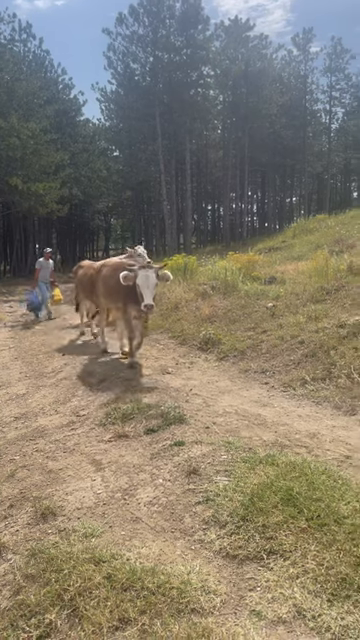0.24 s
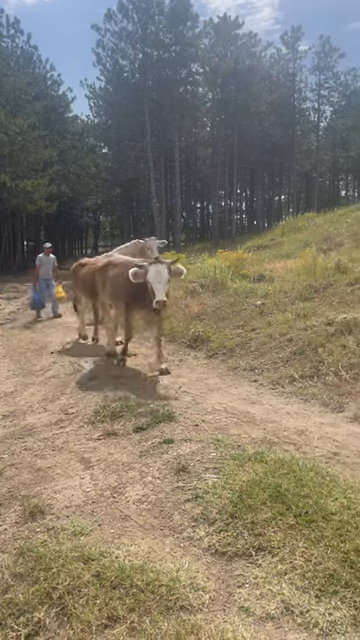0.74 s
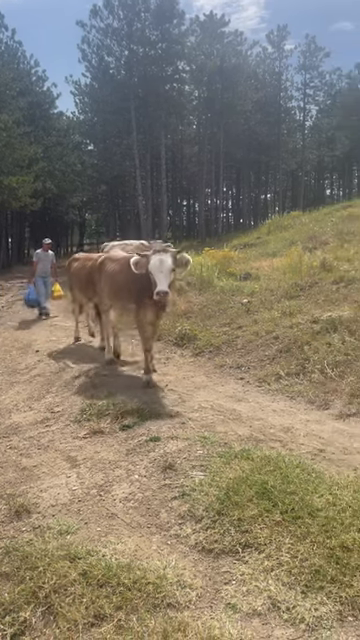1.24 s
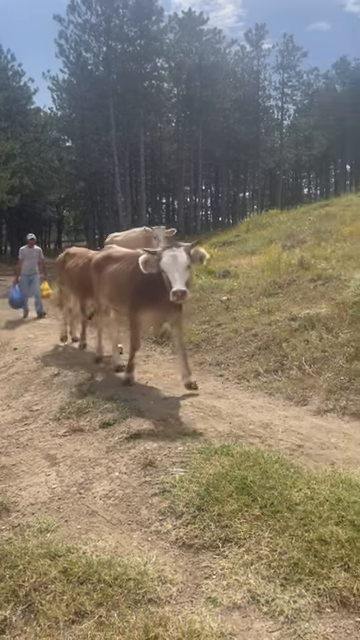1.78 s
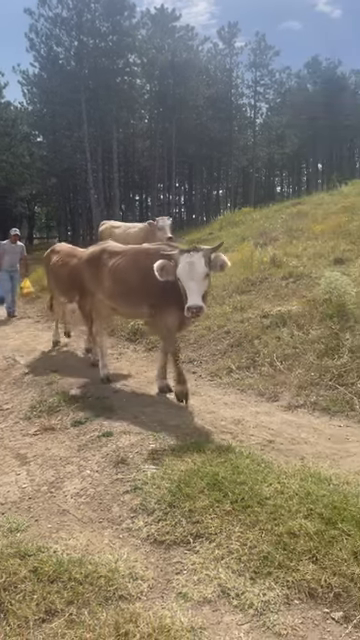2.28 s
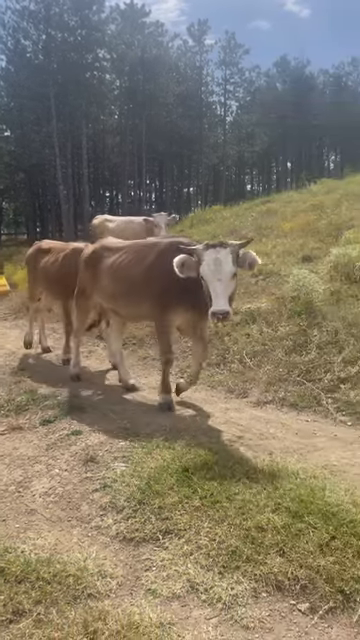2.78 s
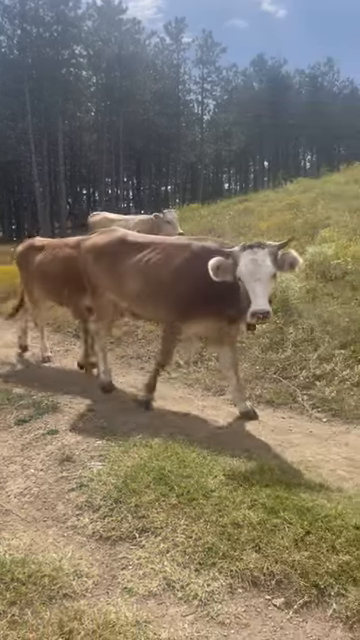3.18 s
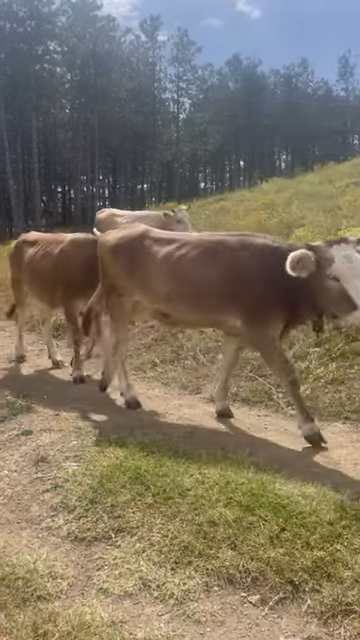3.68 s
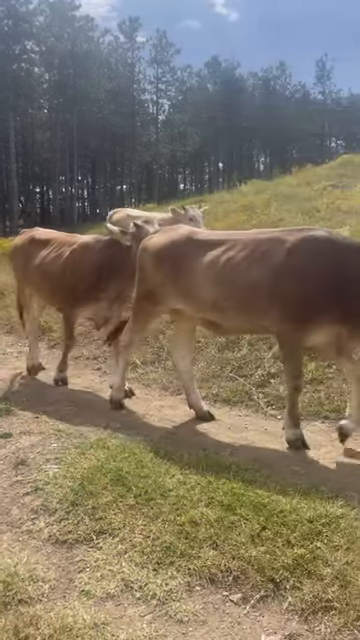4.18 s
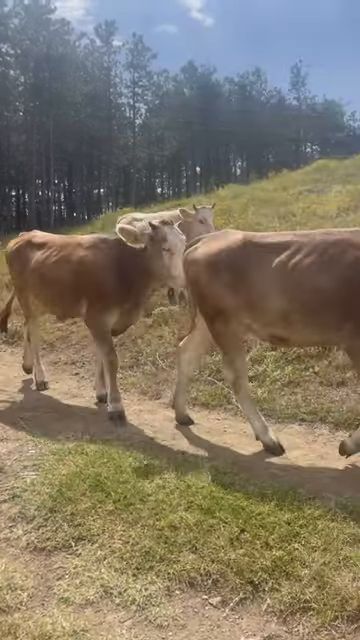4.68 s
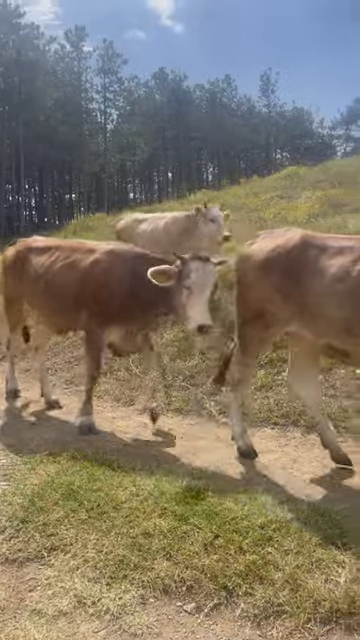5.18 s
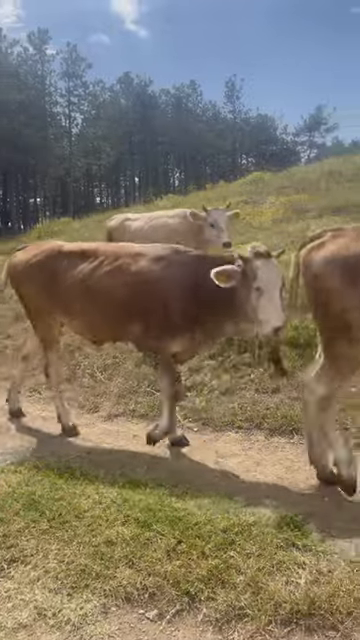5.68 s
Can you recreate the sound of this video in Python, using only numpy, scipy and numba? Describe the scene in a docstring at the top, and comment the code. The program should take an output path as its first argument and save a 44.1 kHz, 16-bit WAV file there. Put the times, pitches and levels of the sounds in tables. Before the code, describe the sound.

Outdoors, a tinny bell on a walking cow clatters irregularly, a purer bell rings farther off, hooves thud, and wind finally buffets the microphone.

```python
"""Wind rumbles on the microphone (low noise) over hissing grass (coloured noise) and a distant engine hum (sines).
A pure bell rings farther off (swelling sines); near by, a small sheet-metal bell clanks, rebounds and skids
(decaying modes driven by clicks). Hooves thud (falling sines), crunch and throw earth on a dry mountain
track (noise bursts), among small shifting stones. At the end a gust rumbles on the microphone."""
import sys
import numpy as np
from scipy import signal
from scipy.fft import rfft, irfft, next_fast_len
from scipy.io import wavfile
from numba import njit

SR = 44100
rng = np.random.default_rng(int(sys.argv[2]) if len(sys.argv) > 2 else 0)


def inscribe(sig):
    """Save sig as 16-bit PCM at rate SR to the path in sys.argv[1].

    A 1-D sig is mono; a 2-D sig holds one channel per row.
    Samples are clipped to [-1, 1] before scaling.
    """
    pcm = np.round(np.clip(np.atleast_2d(sig).T, -1, 1) * 32767)
    wavfile.write(sys.argv[1], SR, pcm.astype(np.int16))


N = 261942
TIME = np.arange(N) / SR   # s


def from_db(db):
    """Turn decibels into a gain."""
    return 10 ** (np.asarray(db) / 20)


def rms_one(x):
    """Scale to an average strength (rms) of 1."""
    return x / np.sqrt(np.mean(x ** 2) + 1e-20)


def in_time(rows):
    """Draw each column of a table as a curve with a value at every sample."""
    s, *columns = np.transpose(rows)
    return [np.interp(TIME, s, column) for column in columns]


def at_hz(points, hz):
    """Read a curve over frequency, spacing octaves evenly as the ear does."""
    f, value = np.transpose(points)
    return np.interp(np.log(np.maximum(hz, 1)), np.log(f), value)


def drift(rate_hz):
    """Smooth random wander around 0 with a spread near 1; a higher rate wanders faster."""
    knots_per_s = 100
    knots = rng.standard_normal(int(N / SR * knots_per_s) + 2)
    memory = np.exp(-2 * np.pi * rate_hz / knots_per_s)
    smooth = rms_one(signal.lfilter([1], [1, -memory], knots))
    return np.interp(TIME * knots_per_s, np.arange(len(knots)), smooth)


def clicks(times, gains):
    """Put a one-sample click at each time."""
    out = np.zeros(N)
    at = np.round(np.asarray(times) * SR).astype(int)
    np.add.at(out, np.clip(at, 0, N - 1), gains)
    return out


def ring(blows, hz, t60):
    """Each click starts a rotation that loses 60 dB in t60 seconds; its imaginary part is the sound."""
    pole = from_db(-60 / (t60 * SR)) * np.exp(2j * np.pi * hz / SR)
    return signal.lfilter([1], [1, -pole], blows + 1e-18)


def die_away(blows, t60):
    """Loudness curve that jumps at each click and loses 60 dB in t60 seconds."""
    return signal.lfilter([1], [1, -from_db(-60 / (t60 * SR))], blows + 1e-18)


@njit
def vibrate(drive, loss, turn):
    """One mode whose loss and turn per sample may change; the imaginary part is the sound."""
    out, state = np.zeros(len(drive), np.complex128), 0j
    pole = np.exp(complex(-loss[0], turn[0]))
    for i in range(1, len(drive)):
        if loss[i] != loss[i - 1] or turn[i] != turn[i - 1]:
            pole = np.exp(complex(-loss[i], turn[i]))
        state = state * pole + drive[i] + 1e-18
        out[i] = state
    return out


# how far the left microphone port runs ahead of the right: (f/Hz, phase/rad)
PORT_LEAD = [(700, .3), (1600, .35), (3000, -.5), (4400, -.1), (5500, 1.55), (6500, 1.7), (8267, 2.15),
             (9400, 2.65), (11400, 3.0), (13200, 2.8), (14200, 2.2), (16000, 2.1)]


def place(tone, hz, pan_db, lead=0):
    """A tone reaches the two microphones with its own level and phase at each."""
    half = from_db(pan_db / 2) * np.exp(.5j * (at_hz(PORT_LEAD, hz) + lead))
    power = (abs(half) ** 2 + abs(half) ** -2) / 2
    return np.array([(tone * half).imag, (tone / half).imag]) / np.sqrt(power)


def from_point(x, spectrum):
    """Colour a broad sound and give it the port phases of a single source in front."""
    size = next_fast_len(N + SR // 10)
    hz = np.fft.rfftfreq(size, 1 / SR)
    left_right = np.array([[1], [-1]])
    phase = np.exp(.5j * at_hz(PORT_LEAD, hz) * left_right)
    return irfft(rfft(x, size) * from_db(at_hz(spectrum, hz)) * phase, size)[:, :N]


# how alike left and right are in the open air: (f/Hz, likeness -1..1)
LIKENESS = [(60, .99), (130, .98), (290, .8), (640, .35), (1400, .25), (2500, -.15), (4400, 0), (7000, -.2),
            (9000, -.8), (11500, -.97), (15000, -.75)]


def coloured(spectrum):
    """Stereo noise of a given colour, alike in the bass and spread out above; its middle has rms 1."""
    size = next_fast_len(N)
    hz = np.fft.rfftfreq(size, 1 / SR)
    alike = at_hz(LIKENESS, hz)
    mid, side = rfft(rng.standard_normal((2, size))) * from_db(at_hz(spectrum, hz))
    side = side * np.sqrt((1 - alike) / (1 + alike))
    mid, side = irfft(mid, size)[:N], irfft(side, size)[:N]
    return np.array([mid + side, mid - side]) / np.std(mid)


# wind on the microphone, a slack breeze and then a gust: (t/s, level/dB)
WIND = [(0, -48), (1, -52), (1.7, -48), (2.85, -60), (3.2, -56), (3.62, -55), (4.3, -60), (4.83, -48),
        (5.2, -51.5), (5.77, -51), (5.86, -44.5), (5.94, -36.5)]
# colour of its rumble: (f/Hz, level/dB)
RUMBLE = [(20, -18.5), (35, 2.5), (52, 4), (80, 3), (110, -1.5), (160, -19.5), (250, -19.5), (500, -33.5),
          (1000, -87)]


def wind(lumps_db=8.0, buffet_db=-7, buffet_growth=0.31, buffet_lumps_db=3):
    """Air rumbles on the ports; a strong gust adds quicker eddies that come in lumps."""
    db, = in_time(WIND)
    eddy_db = db + buffet_db + buffet_growth * (db - db.max())   # eddies grow faster than the rumble
    eddy_db = eddy_db + buffet_lumps_db * np.tanh(drift(8.4))
    eddies = from_db(eddy_db) * coloured([(50, -24.0), (110, 6.5), (180, 7.5), (260, -11.5),
                                          (420, -37.5), (900, -75.0)])
    return from_db(db + lumps_db * np.tanh(drift(2.6))) * coloured(RUMBLE) + eddies


# colour of the open air and hissing grass: (f/Hz, level/dB)
AIR = [(100, -11.5), (200, 4.5), (400, -5), (720, -3.5), (950, -7.5), (1500, -8.5), (2200, -12),
       (3000, -15.5), (3900, -16.5), (4800, -4), (5800, -16), (7000, -18.5), (8500, -34.5), (11000, -51),
       (13500, -39.5), (15500, -31.5)]


def grass_and_air(level_db=-58):
    """Hissing grass and open air: wide, coloured noise whose level wanders a little."""
    return from_db(level_db + 2.0 * drift(8.6)) * coloured(AIR)


# distant engine, in the end speeding up:
# (t/s, firing f/Hz, fundamental level/dB, order 1.5 level/dB, second harmonic level/dB)
ENGINE = [(0, 70.5, -60, -56, -43), (.65, 69.8, -59.5, -50, -56.5), (1.2, 69, -44.5, -50, -50.5),
          (2, 71, -42.5, -53.5, -59.5), (3, 73.8, -44.5, -56.5, -59), (3.5, 77.3, -43, -54.5, -61),
          (4.5, 79, -46, -59.5, -60), (5, 82, -50.5, -69, -78), (5.94, 82.6, -56.5, -80, -69)]


def engine(waver_hz=1.17, flutter_db=-2.5):
    """Only the lowest tones of a far engine carry; the air makes them waver."""
    hz, first_db, between_db, second_db = in_time(ENGINE)
    turn = 2 * np.pi * np.cumsum(hz + waver_hz * drift(2.84)) / SR
    orders = [(1, first_db), (3 / 2, between_db), (2, second_db)]
    return sum(from_db(db + flutter_db * drift(12.0)) * np.sin(k * turn) for k, db in orders)


# tones of the farther bell: (f/Hz, level/dB, share of the ring time)
FAR_BELL = [(2565, 0, 1), (2576, -12, .8), (6790, -21, .6)]
# its notes: (start t/s, muting t/s, level/dB)
FAR_NOTES = [(0, 0.067, -51), (0.108, 0.187, -50.5), (0.46, 0.532, -58.5), (0.932, 1.012, -44),
             (1.347, 1.413, -59.5), (1.723, 1.796, -60), (1.937, 2.037, -56), (2.355, 2.385, -41),
             (2.454, 2.547, -55.5), (2.564, 2.64, -61), (2.9, 2.948, -55.5), (3.293, 3.336, -46.5),
             (3.392, 3.436, -46.5), (3.71, 3.814, -52), (4.241, 4.333, -48), (4.376, 4.407, -48.5),
             (4.476, 4.58, -49.5), (4.638, 4.7, -50), (4.699, 4.705, -38), (4.77, 4.805, -44.5),
             (5.191, 5.246, -43), (5.296, 5.373, -56), (5.75, 5.833, -53)]
FAR_SWELL_S, FAR_MUTED_T60_S = .012, .19   # it swells until its clapper settles on the wall
FAR_LINGER_DB, FAR_LINGER_T60_S = -13, 0.73   # part of the ring outlasts the muting
FAR_LEAD_RAD = 2.05   # the left side runs this far ahead


def far_bell(waver_db=2.0):
    """Each note of the purer bell swells, holds and is muted; its level wavers as it swings."""
    out = np.zeros((2, N))
    for start, end, db in FAR_NOTES:
        at = max(int(start * SR), 0)
        t = TIME[:min(SR // 2, N - at)]
        late = np.maximum(start + t - end, 0)
        muted_db = -60 * late / FAR_MUTED_T60_S
        linger_db = FAR_LINGER_DB - 60 * late / FAR_LINGER_T60_S
        fade_db = np.maximum(muted_db, linger_db)
        swell = 1 - np.exp(-t / FAR_SWELL_S)
        for hz, mode_db, ring_share in FAR_BELL:
            envelope = from_db(db + mode_db + fade_db / ring_share) * swell
            phase = 2 * np.pi * hz * (at / SR + t) + np.array([[FAR_LEAD_RAD], [0]])
            out[:, at:at + len(t)] += envelope * np.sin(phase)
    return out * from_db(waver_db * drift(9.1))


# clapper blows: (t/s, middle ring level/dB, low, high and top ring over it level/dB x3,
# lean towards the upper modes of the low, middle and high ring level/dB x3,
# lean towards the two inner high modes level/dB)
STRIKES = [(0.002, -62, 14, -8, -7, 6, 5, -2, 0), (0.133, -52, -9, -3, -11, -2, 3, 2, -7),
           (0.4158, -35.5, -11.5, 2.5, -3.5, 12, -1, -2, 6),
           (0.5838, -30.5, -15.5, -3.5, -16.5, 29, -13, 2, 5), (0.826, -43, -16, 0, -7.5, -7, -2, -6, 3),
           (1.0768, -39, -10.5, 4.5, -3.5, 7, -1, -2, -3), (1.4161, -48, -8, 8, -9, 8, -8, -3, 5),
           (1.581, -29.5, -1, 6, -5, -3.5, 0, -11, -5), (1.6481, -26.5, -10.5, 0.5, -7, 7, -11.5, -2, 15),
           (1.7904, -40.5, -1.5, -6, -7, 18, 6, 5, -3), (2.106, -59.5, 4, -13, -20, 10, 7, 0, 3),
           (2.2261, -23.5, -3.5, 7, -2, 20, -14, 10, 18), (2.267, -32.5, -34, 10.5, -17, -4, 2, 0, 21),
           (2.355, -45.5, 4, -12, -14, 22, 0, 2, -2), (2.38, -37.5, 3, -0.5, -4, 29, 3, 8, 0),
           (2.411, -40.5, 5, -5, -7, 24, -1, -4, 2), (2.4657, -48, 5, 0, -1, 2, -9, 0, 0),
           (2.5516, -47.5, -2, 2, -11, -6, -2, 2, 0), (2.5795, -46, 2, 2, -6.5, 8, 4, -6, 0),
           (2.7362, -26, -1, -0.5, -2.5, -2.5, -3, -9, -14), (2.8535, -43.5, -12, -9, -11, 6, -4, -4, -9),
           (2.9607, -47, -6, -1, -11, 14, 12, 4, 3), (3.0136, -49, -6, 4, -1, -13, 11, 6, -2),
           (3.4123, -26, 1.5, 2, -10, 15, 10, 5, -7), (3.4338, -25, 0, 2, -25, 17.5, -15, 1, 18),
           (3.474, -39.5, 8.5, 8.5, -3, -8, -10, 4, -4), (3.488, -34.5, -5, 4, -17, -15, -5, -4, -7),
           (3.504, -37, 0, 2, -3, -12, 1, -4, 2), (3.6434, -19, -6, 1.5, -2, -12, -1, 5, 2),
           (3.664, -40, -4, 11, 5, 9.5, -1, -10, 11), (3.6783, -37, -14, 8, -1, 9, -16, -5, 11),
           (3.6956, -33.5, -25, 2.5, -7, -0.5, -8, -15, 12),
           (3.765, -48.5, 2.5, 6.5, -10, -4, -8, -10, -14), (3.812, -33.5, 0, 1.5, 0.5, -29, 11, 7, -17),
           (3.851, -42, -14, 9.5, -1, -15, 0, -15, -19), (4.0369, -23.5, -7, 8.5, 6.5, 1.5, -4, -12, 6),
           (4.086, -34, -20, -4, -5, 17, 16, -2, -9), (4.336, -39.5, -6, -2, -9, 16, 10, -2, -2),
           (4.402, -44, -3, -1, -2, -4.5, 2, -5, -3), (4.7235, -31.5, -1, 3.5, -1, 10.5, 9, 3, 11.5),
           (4.7991, -34, -11, 0.5, -2.5, -5, 10, -8, 14), (4.8576, -36, -10.5, -1, -2.5, -5, 1, -5.5, -4),
           (5.3703, -25, -7.5, 1, -10.5, 9, 14, -1, -16), (5.4281, -36, -4.5, 7.5, -1.5, -17, -9, -7, 8),
           (5.477, -45.5, 7.5, -22, -18, 15, -0.5, 6, 8), (5.657, -36, -23, -3, -18, 18, 11, 9, 1),
           (5.7048, -35.5, -3, -13, 2, -4.5, 16, 4, -2)]
REBOUND_S, REBOUND_LOSS_DB = 0.036, 17   # the clapper falls back once after a blow, more lightly


def clapper_blows():
    """Every blow and its rebound, which comes after an uneven delay and lands a little to one side."""
    blows = np.array(STRIKES, float)
    chance = rng.standard_normal((len(blows), 6))
    rebounds = blows.copy()
    rebounds[:, 0] += REBOUND_S * np.exp(0.29 * chance[:, 0])
    rebounds[:, 1] += 0.75 * chance[:, 1] - REBOUND_LOSS_DB
    rebounds[:, -4:] += 5 * chance[:, -4:]   # dB of lean
    return np.vstack([blows, rebounds]).T


# the clapper skids along the wall:
# (start t/s, end t/s, level/dB, low ring over it level/dB, high ring over it level/dB)
SKIDS = [(0.624, 0.803, -49.5, -5.5, 5.5), (1.094, 1.3, -71, 4, 6), (1.654, 1.77, -52, -2, 4.5),
         (2.376, 2.452, -54, 4, -5), (3.437, 3.522, -41, -8, -7), (3.659, 3.73, -39.5, -12, 15.5),
         (3.707, 3.795, -61, 12.5, -6), (3.825, 3.904, -45, -8.5, 11), (4.061, 4.165, -47, -3, 6.5),
         (4.351, 4.407, -55, -17, 6), (5.464, 5.611, -46.5, -3, 8.5), (5.631, 5.71, -43.5, -12, 8.5),
         (5.679, 5.774, -42, -8, 3.5)]
SKID_DB, SKID_TOP_DB, SKID_RISE_S, SKID_FALL_S = -0.5, -6.5, 0.0092, 0.052
TOUCHES_PER_S, SKID_SWELL_DB = 220, 2   # the pressure swells and sags as it slides


def skidding(uneven_db):
    """Light touches as the clapper slides and eases off: their sizes, ring colours and when it leans."""
    size, low, high = np.zeros((3, N))
    for start, end, db, low_db, high_db in SKIDS:
        on = (TIME >= start) & (TIME < end)
        pressure = np.minimum((TIME[on] - start) / SKID_RISE_S, (end - TIME[on]) / SKID_FALL_S)
        size[on] = from_db(db) * np.sqrt(np.clip(pressure, 0, 1))
        low[on], high[on] = low_db, high_db
    gaps = (.4 + rng.exponential(.6, N // 50)) / TOUCHES_PER_S
    times = np.cumsum(gaps)
    sizes = from_db(uneven_db * np.clip(rng.standard_normal(len(times)), -2, 2))
    swell = from_db(SKID_DB + SKID_SWELL_DB * np.tanh(drift(4.4)))
    return clicks(times, sizes) * size * swell, [low, 0, high, SKID_TOP_DB], size > 0


def share(lean_db):
    """Gain of a mode favoured over its partner by the point of contact; the pair keeps its energy."""
    return np.sqrt(2 / (1 + from_db(-lean_db) ** 2))


# ways the bell wall vibrates (modes): (f/Hz, ring family 0-3, level/dB, t60/s before RING_FACTOR,
# lower -1 or upper 1 in its ring, outer -1 or inner 1, left-right level/dB)
BELL = [(1572, 0, -3, .42, -1, 0, 9.5), (1611, 0, -3, .41, 1, 0, 8.5), (1771, 0, -30, .12, 0, 0, 5),
        (4338, 1, -7, .16, -1, 0, 1), (4395, 1, -2, .2, 1, 0, 0), (4424, 1, -13, .1, 1, 0, 0),
        (5405, 2, -8, .085, -1, -1, 1), (5505, 2, -6, .09, -1, 1, 0), (5748, 2, -7, .08, 1, 1, 0),
        (5825, 2, -8, .085, 1, -1, 0), (5915, 2, -20, .06, 0, 0, 0), (6478, 2, -29, .14, 0, 0, 0),
        (8267, 3, -1, .18, 0, 0, 0), (8775, 3, -25, .04, 0, 0, 0), (9130, 3, -14, .09, 0, 0, 0),
        (9705, 3, -11, .05, 0, 0, 0), (11350, 3, -22, .04, 0, 0, 0), (13180, 3, -24, .04, 0, 0, 0),
        (13865, 3, -27, .045, 0, 0, 0), (14170, 3, -20, .035, 0, 0, 0), (15400, 3, -13, .02, 0, 0, 0)]
# the next five have one value for each ring family: low, middle, high, top
RING_FACTOR = [0.92, 0.82, 0.42, 0.84]   # multiplies the ring time
LEANING_LOSS = [70, 25, 15, 100]   # extra loss while the clapper leans on the wall (dB per s)
FAMILY_DB = [0, -0.5, 3, 2]   # answer to a blow (level/dB)
POLARITY = [1, 1, -1, 1]   # the high modes start against the others
SWING_SHARE = [0.89, 0.66, 0, 0.11]   # share of the swing; the finer modes radiate more evenly
# the swinging bell turns its low lobes past the microphones:
# (t/s, extra left-right level/dB, extra lead of the left/rad)
SWING = [(.6, 2.5, -0.62), (1.6, -0.5, 0.023), (2.3, -4, 0.45), (2.76, 9.5, 1.7), (3.43, 3.5, -0.87),
         (3.7, 5, 1.96), (4.06, 3.5, -1.93), (4.73, 2.5, 0.17), (5.38, -2, 0.076), (5.75, -4.5, 0.54)]
# colour of the clapper's contact: (f/Hz, level/dB)
TICK = [(500, -32.5), (1000, -22), (1500, 15), (2000, 13), (2800, 10), (4000, 14), (5500, 17), (7000, -1.5),
        (8500, 17), (10000, 3.5), (12000, -36.5), (15000, -23)]
# air in the bell's mouth, pumped by flat blows: (t/s, level/dB)
MOUTH = [(1.399, -44), (2.05, -49), (2.5, -46.5), (2.57, -43), (3.474, -40), (3.488, -41), (3.505, -34.5),
         (3.644, -40), (3.661, -47), (4.361, -39.5), (5.66, -44)]
MOUTH_T60_S = .036   # the open mouth holds its air only briefly
CRACK_FOLLOWS_HIGH = 0.75   # dB of crack for each dB of high ring


def near_bell(detune=0.003, build_s=0.0013, uneven_db=7.0, wander_db=3, tick_db=-12,
              tick_t60=0.015, skid_tick_db=-13, mouth_hz=735, puff_t60=0.048):
    """Where the clapper lands picks which modes ring more; the swinging bell beams from side to side."""
    (times, strength_db, low_db, high_db, top_db,
     low_lean_db, middle_lean_db, high_lean_db, inner_lean_db) = clapper_blows()
    skid, skid_colour_db, leaning = skidding(uneven_db=3.0)
    out, touches = np.zeros((2, N)), np.flatnonzero(skid)
    # the blow that each skid slides on from
    landing = np.searchsorted(times[:len(STRIKES)], TIME[touches]) - 1
    sway_db, sway_lead = in_time(SWING)
    colour_db = [low_db, 0, high_db, top_db]
    lean_db = [low_lean_db, middle_lean_db, high_lean_db, 0]
    for hz, family, db, t60, upper, inner, pan_db in BELL:
        # the weaker, finer mode shapes answer differently to every blow
        chance_db = uneven_db * min(abs(db) / 20, 1) ** 2 * rng.standard_normal(len(times))
        blow_db = strength_db + FAMILY_DB[family] + colour_db[family] + chance_db
        favour = share(upper * lean_db[family]) * share(inner * inner_lean_db)
        drive = clicks(times, from_db(blow_db) * favour)
        # a sliding clapper keeps feeding these modes, more or less as it passes nodes and crests
        slide_db = skid_colour_db[family] + wander_db * np.tanh(drift(10.0))
        drive[touches] += skid[touches] * from_db(slide_db[touches]) * favour[landing]
        # the blow takes a moment to spread round the shell
        drive = ring(drive, hz, build_s * np.log(1000)) * (1 - np.exp(-1 / (build_s * SR)))
        # a leaning clapper damps the wall and pulls its pitch about
        leaning_loss = leaning * LEANING_LOSS[family] * np.log(10) / 20
        loss = np.log(1000) / (t60 * RING_FACTOR[family]) + leaning_loss
        pitch = hz * (1 + detune * leaning * drift(10.7))
        tone = vibrate(drive, loss / SR, 2 * np.pi * pitch / SR)
        tone = POLARITY[family] * from_db(db) * tone
        swing = SWING_SHARE[family]
        out += place(tone, hz, pan_db + swing * sway_db, swing * sway_lead)
    # the contact itself is a short crack, strongest on bright blows
    crack = clicks(times, from_db(strength_db + CRACK_FOLLOWS_HIGH * high_db + tick_db))
    contact = crack + skid * from_db(skid_tick_db)
    out += from_point(die_away(contact, tick_t60) * rng.standard_normal(N), TICK)
    # noisy puffs, scaled so that a 0 dB puff has energy 1, make the air in the mouth ring
    s, db = np.transpose(MOUTH)
    puffs = die_away(clicks(s, from_db(db)), puff_t60) * rng.standard_normal(N)
    puffs = puffs / np.sqrt(puff_t60 * SR / np.log(10 ** 6))
    return out + place(ring(puffs, mouth_hz, MOUTH_T60_S), mouth_hz, pan_db=4.5)


def gravel(per_s=25, level_db=-55, spread_db=0.0, t60=0.068):
    """The rest of the herd shifts small stones and dry stalks: random short bursts of noise."""
    sizes = from_db(level_db + spread_db * np.minimum(rng.exponential(1, N), 3))
    chance = per_s * from_db(4 * drift(3)) / SR   # busier and quieter spells
    grains = (rng.random(N) < chance) * sizes
    colour = [(200, -16.0), (700, 8.0), (2000, 4.5), (4000, 1.0), (7000, -12.0), (12000, -48.0)]
    return from_point(die_away(grains, t60) * rng.standard_normal(N), colour)


LIGHT_STEPS_PER_S, LIGHT_THUD_DB, LIGHT_GRIT_DB, LIGHT_HZ = 1.8, -60, -64.5, 880   # middle values


def light_steps(spread_db=1.5):
    """The softer steps of the herd, loosely spaced, as rows like those of the heavy ones."""
    steps = []
    for k, (late, weight, hardness) in enumerate(rng.uniform(-1, 1, (40, 3))):
        s = (k + .5 + .5 * late) / LIGHT_STEPS_PER_S
        weight_db = spread_db * weight
        hz = LIGHT_HZ * 2 ** (.5 * hardness)
        steps.append((s, LIGHT_THUD_DB + weight_db, hz, LIGHT_GRIT_DB + weight_db))
    return [step for step in steps if step[0] < TIME[-1]]


# heavy hoof falls and kicked stones: (t/s, thud level/dB, reference pitch f/Hz, grit level/dB)
HOOVES = [(.148, -46, 1470, -48), (.916, -40.5, 1210, -42), (1.216, -46.5, 754, -48.5),
          (1.312, -47.5, 1370, -48), (1.523, -67, 880, -46.5), (1.573, -32.5, 706, -43.5),
          (1.583, -32.5, 328, -54), (1.617, -39.5, 467, -49), (1.7795, -39.5, 840, -56),
          (1.787, -40.5, 346, -57), (2.098, -53, 790, -49.5), (3.049, -60, 1300, -57),
          (3.069, -56, 1300, -52), (3.112, -46, 1030, -49.5), (3.569, -45, 1300, -60),
          (4.112, -49, 1390, -45), (4.149, -35.5, 654, -45), (4.851, -26.5, 1730, -40),
          (4.8527, -31, 1850, -42), (4.976, -36.5, 680, -42), (4.986, -50, 1630, -43),
          (5.001, -37.5, 740, -49), (5.622, -57, 614, -44.5)]
# pitch sinks as this power of the time pressed, counted from a little before contact
THUD_FALL, THUD_LEAD = .65, .2
# the push peaks at a fifth of this time on soft ground, or of so many cycles on a hard stone
PRESS_S, PRESS_CYCLES = 0.012, 6.48
# loose earth over a 500 Hz thud; harder ground throws less
EARTH_DB, EARTH_DB_PER_OCTAVE = -8, -6


def hooves():
    """A hoof presses out a thud that falls in pitch, crushes grit and throws loose earth."""
    thuds, grit, dust = np.zeros((3, N))
    for s, db, hz, grit_db in list(HOOVES) + light_steps():
        at = int(s * SR)
        t = TIME[:min(SR // 10, N - at)]
        age = t / (min(PRESS_S, PRESS_CYCLES / hz) / 5)
        push = age * np.exp(1 - age)   # rises to 1 at age 1, then fades
        pitch = hz * (age + THUD_LEAD) ** -THUD_FALL
        earth_db = db + EARTH_DB + EARTH_DB_PER_OCTAVE * np.log2(hz / 500)
        step = slice(at, at + len(t))
        thuds[step] += from_db(db) * push * np.sin(2 * np.pi * np.cumsum(pitch) / SR)
        grit[step] += from_db(grit_db) * push
        dust[step] += from_db(earth_db) * np.sqrt(push)   # the earth lasts longer than the push
    crunch = coloured([(500, -33), (1500, 6.0), (3500, -7.0), (6000, -8.0), (10000, -38.5), (16000, -26.0)])
    earth = coloured([(60, 3.5), (170, 21), (400, -3.5), (800, 8), (1500, -25.0),
                      (4000, -28.0), (9000, -64.0)])
    left_right = from_db([[1.5], [-1.5]])
    return (thuds + dust * earth) * left_right + grit * crunch


# single eddies on the microphone: (t/s, peak level/dB, pitch f/Hz)
BUFFETS = [(1.681, -37, 44.4), (2.827, -33, 59), (4.829, -37, 72), (5.668, -34, 65), (5.777, -32, 92.5),
           (5.842, -28.5, 63.6), (5.865, -29, 134), (5.92, -23, 61.6)]


def buffets(cycles=0.72):
    """Single eddies strike the ports: each is a dull thump, a cycle or two long."""
    out = np.zeros(N)
    for s, db, hz in BUFFETS:
        turns = hz * (TIME - s)
        near = abs(turns) < 4
        swell = np.exp(-(turns[near] / cycles) ** 2)
        out[near] += from_db(db) * swell * np.sin(2 * np.pi * (turns[near] + rng.random()))
    return out


def hillside(x, t60, delay_s):
    """Thin scatter from ground, slope and trees: fading noise echoes, different at each side."""
    t = TIME[:SR]
    scatter = rng.standard_normal((2, SR)) * from_db(-60 * t / t60) * (t > delay_s)
    scatter = signal.sosfilt(signal.butter(1, 5000, fs=SR, output="sos"), scatter)
    scatter = scatter / np.sqrt(np.sum(scatter ** 2) / 2)
    return signal.fftconvolve(x, scatter, axes=1)[:, :N]


def scene():
    """Bells and hooves on the open slope, over wind, grass and engine."""
    background = wind() + grass_and_air() + engine()
    far = far_bell()
    near = near_bell() + hooves()
    near_echo = from_db(-15.5) * hillside(near, t60=0.043, delay_s=0.0069)
    far_echo = from_db(-14.5) * hillside(far, t60=.5, delay_s=0.07)
    return background + far + near + near_echo + far_echo + gravel() + buffets()


def record(dry):
    """Cut the top steeply above 16400 Hz."""
    return signal.sosfilt(signal.ellip(10, .2, 80, 16400, fs=SR, output="sos"), dry)


dry = scene()
out = record(dry)
inscribe(out)
```